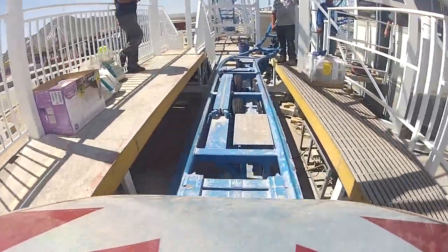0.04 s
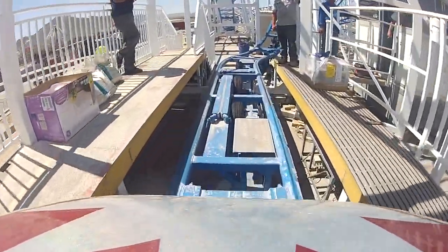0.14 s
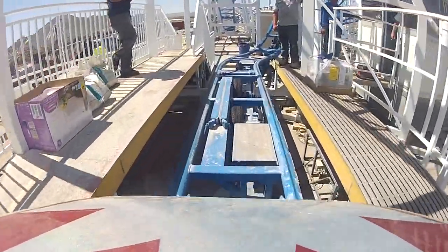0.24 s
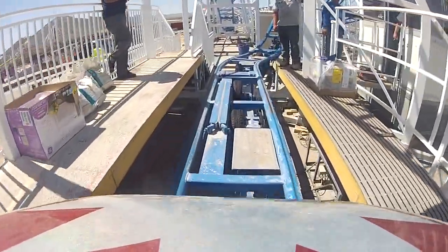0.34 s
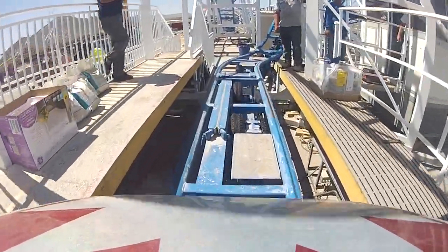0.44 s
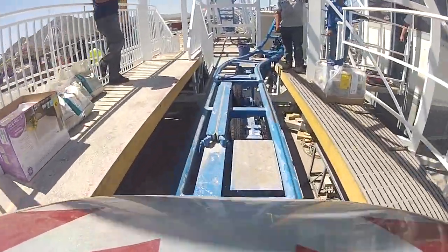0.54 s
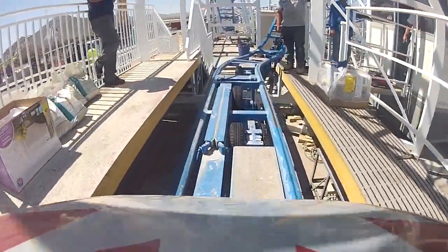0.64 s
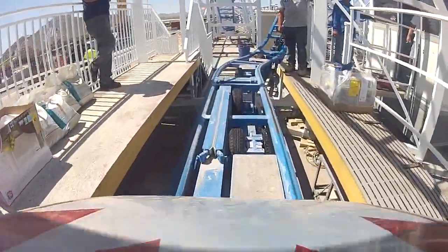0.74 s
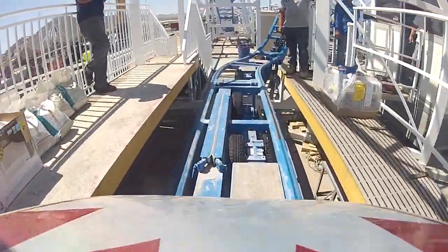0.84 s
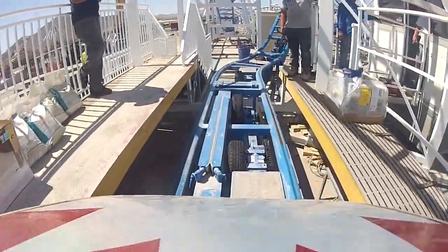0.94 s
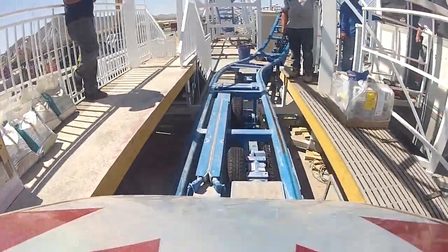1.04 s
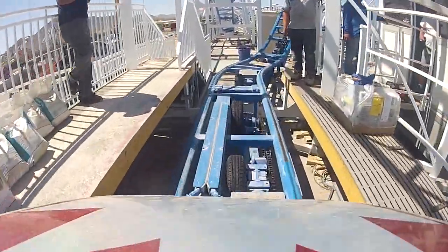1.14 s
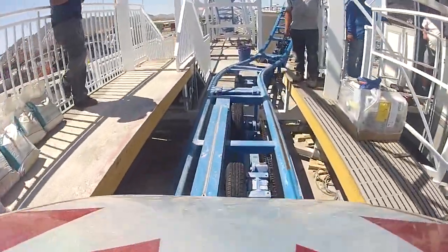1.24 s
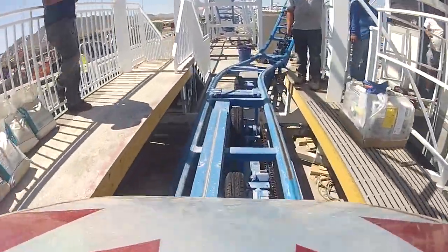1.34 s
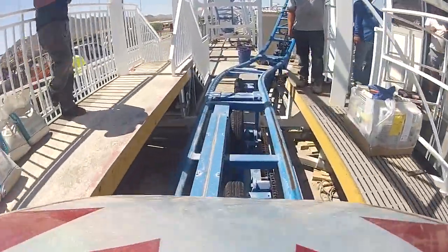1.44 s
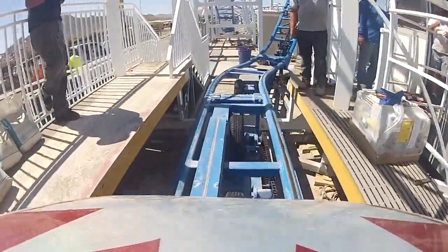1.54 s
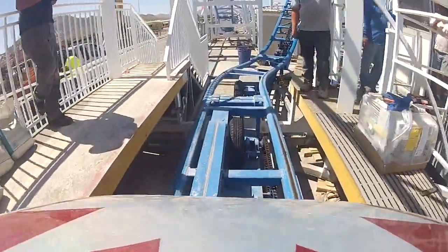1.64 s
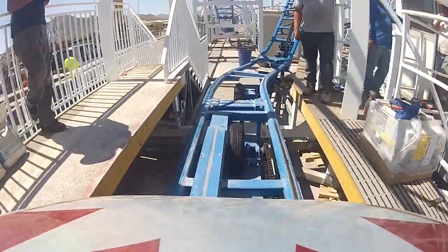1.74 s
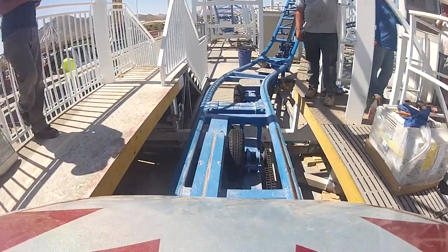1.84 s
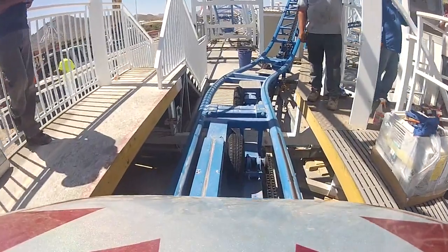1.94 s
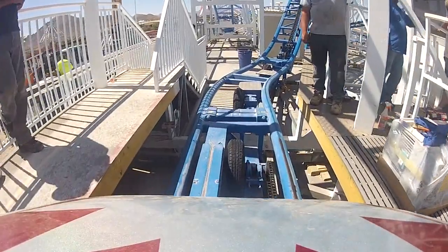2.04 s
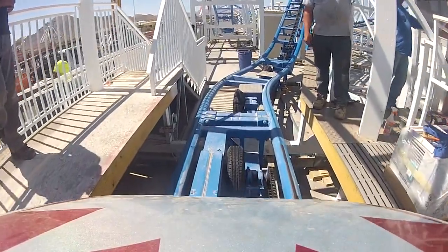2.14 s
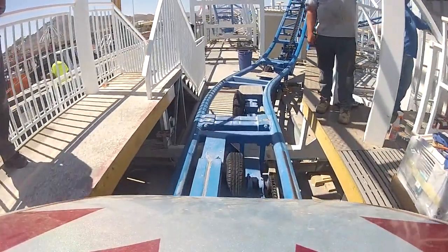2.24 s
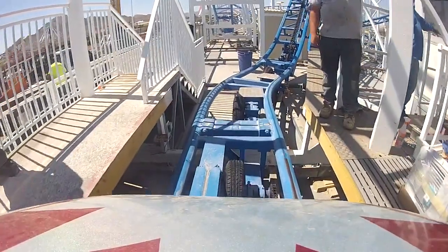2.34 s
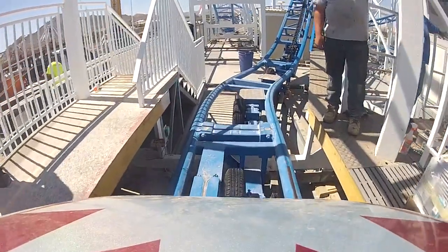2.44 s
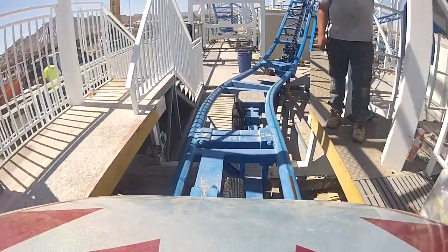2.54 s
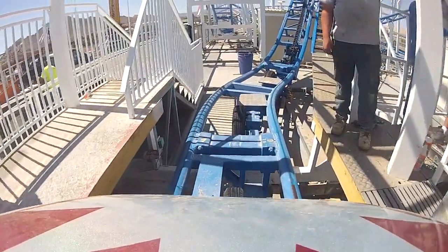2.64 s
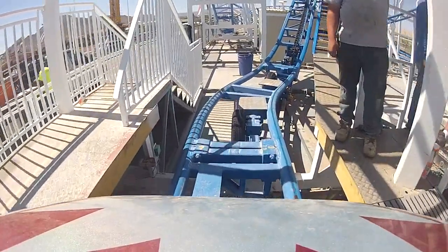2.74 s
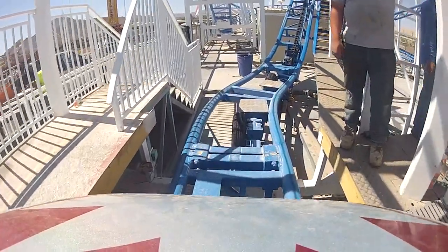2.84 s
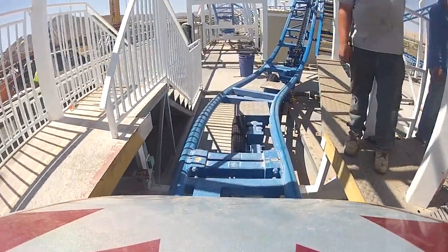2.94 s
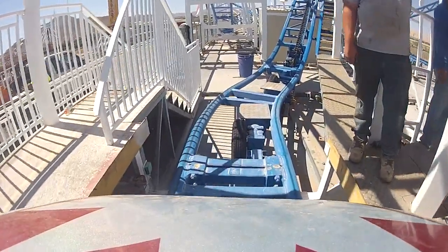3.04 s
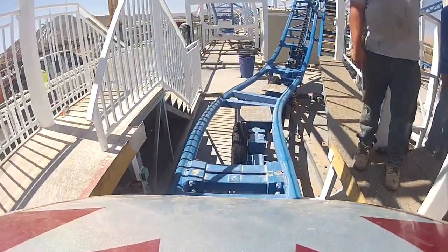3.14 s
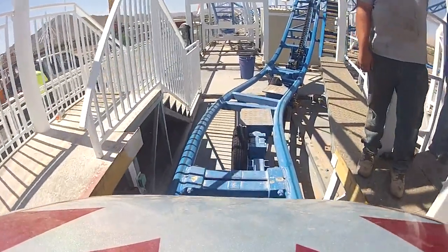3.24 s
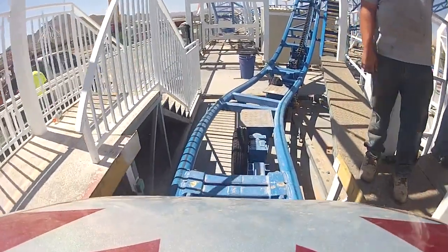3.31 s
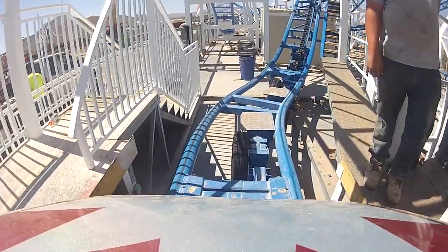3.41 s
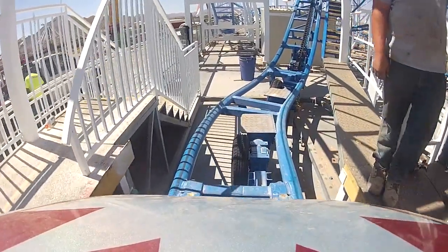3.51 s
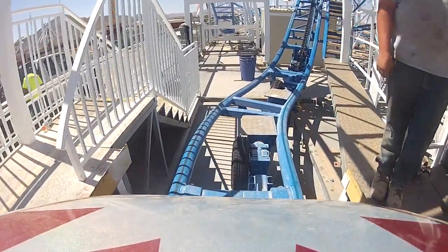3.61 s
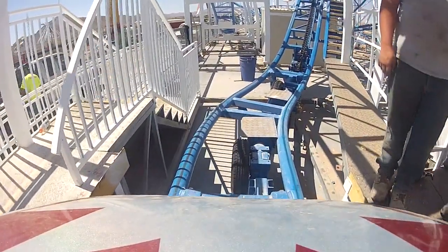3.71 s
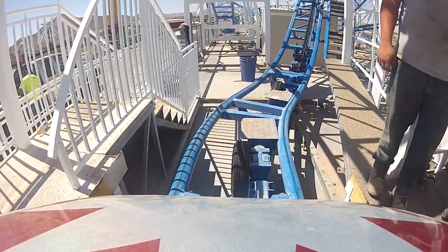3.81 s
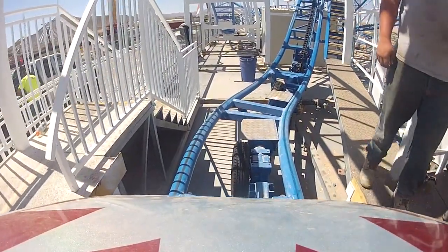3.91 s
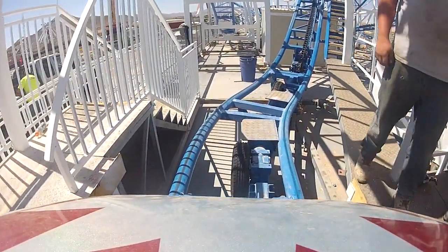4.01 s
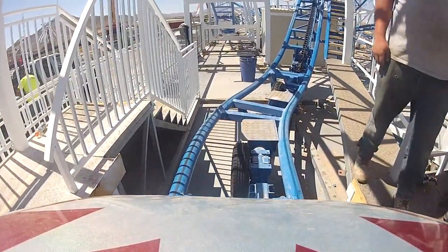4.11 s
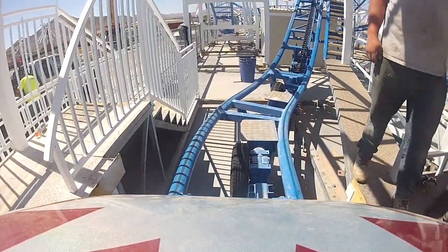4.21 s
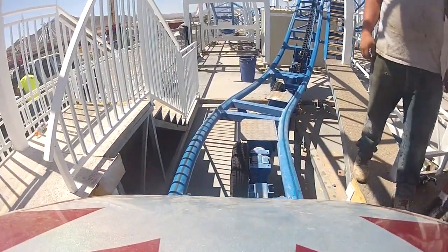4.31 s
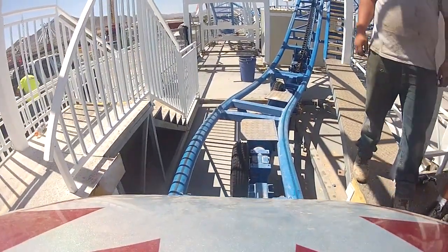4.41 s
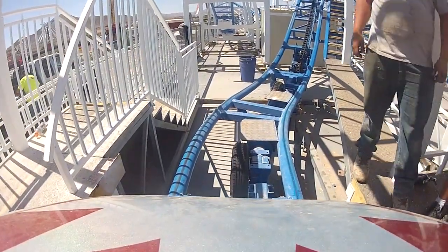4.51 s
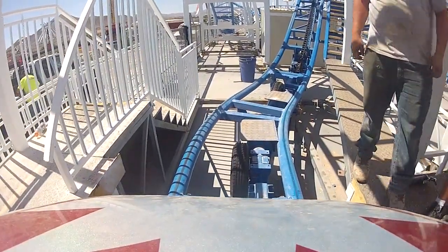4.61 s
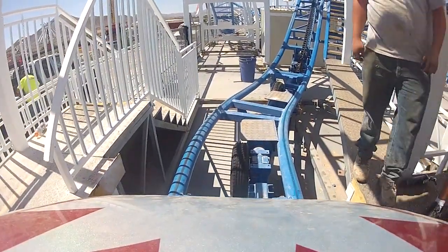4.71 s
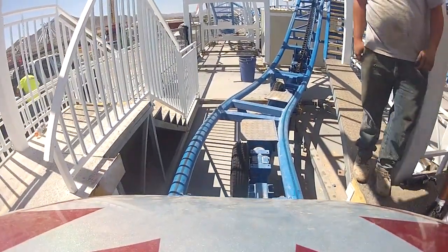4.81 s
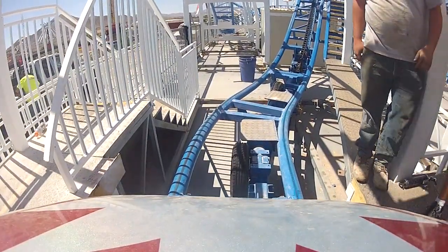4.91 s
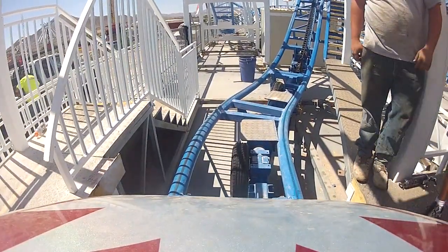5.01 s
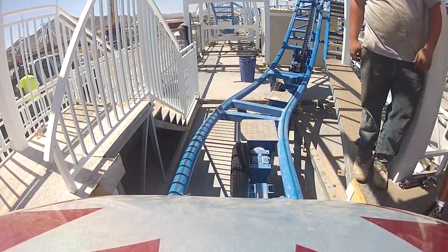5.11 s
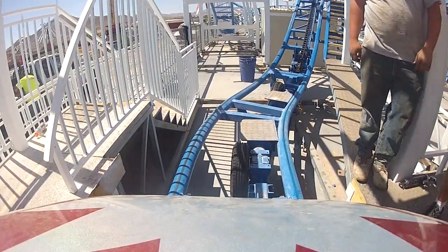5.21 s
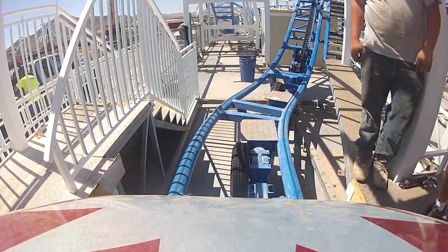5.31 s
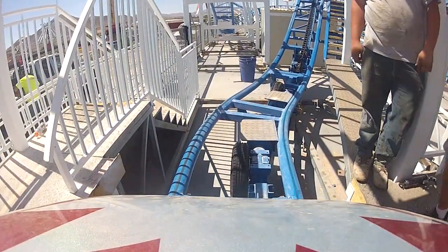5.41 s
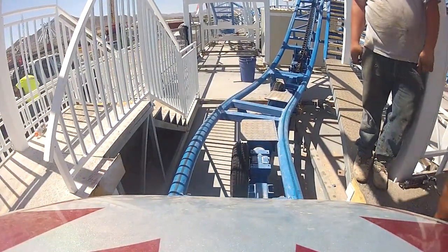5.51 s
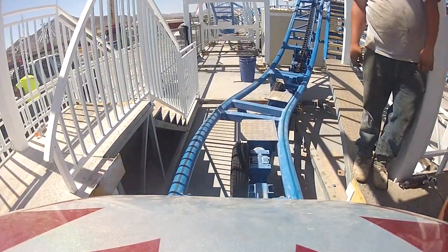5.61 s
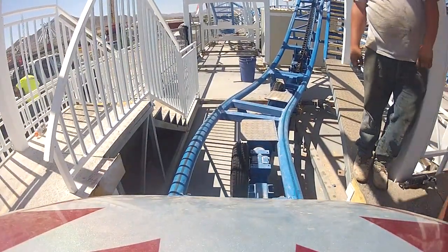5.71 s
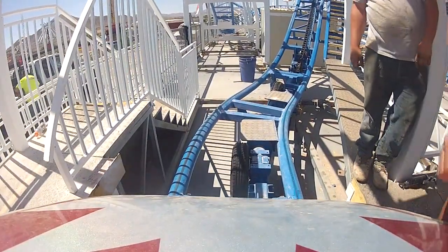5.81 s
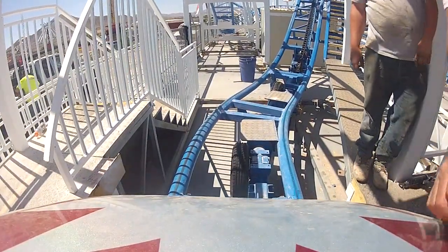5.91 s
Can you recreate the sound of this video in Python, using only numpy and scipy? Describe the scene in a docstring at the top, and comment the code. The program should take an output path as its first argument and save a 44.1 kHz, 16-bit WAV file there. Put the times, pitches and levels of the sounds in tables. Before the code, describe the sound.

A roller coaster train rolls slowly into its station, heard close from the front car. From the start, wheels rumble through the hollow shell with a deep rocking throb. Around 0.7 seconds come a dull thump and low groans from the drive tyres, then more knocks between 1.4 and 1.9 seconds. At 2.5 seconds air brakes hiss softly with another clunk. From 2.8 to 3.3 seconds the cars clunk hard together with steel chatter, brief high tyre squeals, more hiss and a short pad scrape; the hardest hits crackle the microphone, and low groans follow. The rumble eases as the train slows. Near 4 seconds there is a small hiss, a falling squeak and a scrape, then a heavy clunk and a falling groan at 4.2. A few soft knocks come around 5 seconds as the train stops, leaving faint machinery hum and rushing air.

```python
"""A roller coaster train rolls slowly into its station, heard from a microphone on the front car.
Close up, wheels rumble through the hollow shell, the car rocks, and the cars clunk together and stop.
Underneath, drive tyres groan and squeal against the car, air brakes hiss and pads scrape.
Behind it all, the station machinery hums on. There are a few short bright ticks,
and the hardest clunks overload the camera that carries the microphone."""
import sys
import numpy as np
from scipy import signal
from scipy.fft import rfft, irfft
from scipy.io import wavfile
from scipy.ndimage import uniform_filter1d

SR = 44100
rng = np.random.default_rng(int(sys.argv[2]) if len(sys.argv) > 2 else 0)


def to_wav(sig):
    """Store sig (one row per channel, or 1-D mono) as 16-bit WAV at the path in sys.argv[1].

    Samples outside -1..1 are clipped; the rate is SR.
    """
    pcm = np.clip(np.atleast_2d(sig), -1, 1) * 32767
    pcm = np.round(pcm).astype(np.int16)
    wavfile.write(sys.argv[1], SR, pcm.T)  # frames by channels


N = 262836
T = np.arange(N) / SR


def undb(db):
    """Decibels to gain."""
    return 10 ** (np.asarray(db) / 20)


def unit(x):
    """Scale to rms 1."""
    return x / np.sqrt(np.mean(x ** 2))


def walk(rate_hz):
    """Smooth random wandering with spread 1."""
    hz = np.arange(N // 2 + 1) * SR / N
    return unit(irfft(rfft(rng.standard_normal(N)) / (1 + (hz / rate_hz) ** 4), N))


def colour(x, points):
    """Shape x by a spectrum of (f/Hz, level/dB) points, to rms 1."""
    hz, db = np.transpose(points)
    f = np.arange(N // 2 + 1) * SR / N + 1
    gain = undb(np.interp(np.log(f), np.log(hz), db)) / (1 + (hz[0] / f / 2) ** 4)
    return unit(irfft(rfft(x) * gain, N))


def grit(spread_db):
    """Dense micro-impacts of uneven strength."""
    return rng.standard_normal(N) * undb(spread_db * walk(210))


def envelope(s, hold_s, attack_s, release_s, sag_db_per_s=0):
    """Swell up to time s, hold while sagging, die away."""
    age = T - s
    sag = undb(-sag_db_per_s * np.clip(age, 0, hold_s))
    return np.exp(np.minimum(age, 0) / attack_s - np.maximum(age - hold_s, 0) / release_s) * sag


def glide(s, hold_s, hz, octaves_per_s):
    """A pitch that slides evenly from time s for twice the hold."""
    return hz * 2 ** (octaves_per_s * np.clip(T - s, 0, 2 * hold_s))


def phase_of(hz):
    """The running phase of a changing pitch."""
    return 2 * np.pi * np.cumsum(hz) / SR


# Resonances of the track and chassis below the microphone: f/Hz, width/Hz, lift/dB
STEEL_RESONANCES = [(580, 180, 6.5), (715, 130, 4), (878, 46, 5.5), (950, 28, 6.5), (1143, 9.9, 3.5),
                    (1160, 40, 3.5), (1466, 55, 7), (1720, 100, 5.5), (1900, 27, 7), (2043, 67, 7),
                    (2256, 68, 7), (3047, 91, 4.5)]

def steel(x):
    """Track and chassis ring along with any noise that reaches them."""
    ring = sum((undb(db) - 1) * signal.lfilter(*signal.iirpeak(hz, hz / width, fs=SR), x)
               for hz, width, db in STEEL_RESONANCES)
    return unit(x + ring)


# Hum lines of the station machinery: f/Hz, level/dB
HUM_LINES = [(108.5, -45.5), (133.5, -51.5), (172, -56), (353, -86), (640, -75)]
# Air noise around the station: f/Hz, relative level/dB
AIR_SPECTRUM = [(20, 17.5), (50, 25), (75, -6), (120, 20), (220, 16), (330, 10.5), (450, -1.5), (800, -7.5),
                (1100, -2.5), (1500, -4.5), (1850, -10), (2330, 2.5), (2700, -9), (3600, -7), (6000, -23),
                (8000, -17), (14000, -38.5)]

def station(air_db=-49.5):
    """In the background, machinery idles: wavering hum lines over a steady rush of air."""
    hum = sum(undb(db + 2 * walk(5)) * np.sqrt(2) * np.sin(phase_of(hz + 1.5 * walk(8)))
              for hz, db in HUM_LINES)
    swell_db = .5 * walk(10)
    return hum + undb(air_db + swell_db) * steel(colour(rng.standard_normal(N), AIR_SPECTRUM))


# Short bright ticks and overload crackles: t/s, level/dB, f/Hz
BRIGHT_TICKS = [(0.706, -54, 2300), (3.238, -31.5, 1900), (3.625, -57.5, 5570), (4.21, -54.5, 1700)]

def ticks(decay_s=0.0054):
    """Tiny bursts of noise: short bright ticks, and the overload crackle on two hard clunks."""
    out = 0
    for s, db, hz in BRIGHT_TICKS:
        noise = colour(grit(spread_db=-0.5), [(hz / 2, -12), (hz, 0), (2 * hz, -25)])
        out += undb(db) * np.exp(-np.abs(T - s) / decay_s) * noise
    return out


# Dry scrapes of a brake pad: t/s, level/dB, f/Hz, decay/s
PAD_SCRAPES = [(3.057, -33, 2320, 0.037), (4.077, -37, 2100, 0.023)]

def scrapes(rise_s=0.0093):
    """A pad bites with a rasp, then slides off."""
    out = 0
    for s, db, hz, decay_s in PAD_SCRAPES:
        age = np.maximum(T - s, 0)
        spectrum = [(hz / 2, -14), (hz, 0), (1.22 * hz, -6), (2 * hz, -28), (4 * hz, -45)]
        rasp = steel(colour(grit(spread_db=3), spectrum))
        out += undb(db) * (1 - np.exp(-age / rise_s)) * np.exp(-age / decay_s) * rasp
    return out


# Brake hiss as it reaches the front car: f/Hz, relative level/dB
HISS_SPECTRUM = [(300, -20.5), (600, -12.5), (800, -19), (1000, -9.5), (1500, -8.5), (1800, -14.5),
                 (2270, -1), (2700, -15), (3100, -9), (4000, -17), (5300, -21), (6100, -34), (8300, -17),
                 (13000, -43)]
# Bites of the brakes: t/s, hold/s, level/dB, sag/(dB/s), treble/dB
BRAKE_BITES = [(2.455, 0.17, -42, 33.5, 0), (2.817, 0.15, -51, -13, 10), (3.08, 0.16, -43.5, 44, -16),
               (3.375, .04, -51, 4, -25), (3.993, 0.083, -54, 3, 4.5)]

def brakes(split_hz=3000, attack_s=0.022, release_s=0.056):
    """Air escapes and pads rub as the brakes take hold; air is bright, rubbing is dull."""
    hiss = steel(colour(rng.standard_normal(N), HISS_SPECTRUM))
    low = signal.sosfiltfilt(signal.butter(2, split_hz, fs=SR, output="sos"), hiss)
    bites = 0
    for s, hold_s, db, sag_db_per_s, treble_db in BRAKE_BITES:
        grip = undb(db) * envelope(s, hold_s, attack_s, release_s, sag_db_per_s)
        bites += grip * (low + undb(treble_db) * (hiss - low))
    return undb(.5 * walk(20)) * bites


# Tyre slips under the car: t/s, hold/s, level/dB, f/Hz, glide/(octaves/s), roughness/0-1, overtone/dB
TYRE_SQUEALS = [(2.806, 0.029, -33.5, 2028, -1.8, 0.46, -15.5),
                (2.867, 0.065, -33.5, 2055, 0.3, 0.27, -8.5), (4.034, 0.0059, -30.5, 2187, -3, 0.42, -35),
                (4.053, 0.054, -44, 1655, -17, .6, -28)]

def squeal(s, hold_s, db, hz, octaves_per_s, rough, octave_db):
    """Rubber sticks and slips; the rougher the slip, the more pitch and strength scatter."""
    scatter_hz = 360 * rough ** 2 * walk(400)
    phase = phase_of(glide(s, hold_s, hz, octaves_per_s) + scatter_hz)
    flutter_db = 6 * rough * walk(150)
    tone = np.sin(phase) + undb(octave_db) * np.sin(2 * phase)
    return envelope(s, hold_s, attack_s=0.013, release_s=0.018) * undb(db + flutter_db) * tone


# Pushes of the drive tyres: t/s, hold/s, level/dB, sag/(dB/s), f/Hz, glide/(octaves/s)
TYRE_GROANS = [(0.645, 0.11, -15, 8.5, 107, 0.12), (0.881, .03, -13.5, 0, 111, 0.13),
               (1.066, 0.13, -23, -13, 114.7, 0.78), (3.276, 0.059, -15.5, 36, 110.6, -0.92),
               (3.415, 0.021, -18.5, 3, 106, -0.28), (4.001, 0.029, -29.5, -3.5, 108, -0.14),
               (4.233, 0.196, -18.5, 56.5, 171, -0.716)]

def groan(s, hold_s, db, sag_db_per_s, hz, octaves_per_s):
    """Close below the microphone, a drive tyre judders against the underside of the car."""
    phase = phase_of(glide(s, hold_s, hz, octaves_per_s) * (1 + .015 * walk(20)))
    load = envelope(s, hold_s, attack_s=0.021, release_s=0.014, sag_db_per_s=sag_db_per_s)
    return load * undb(db + 1.5 * walk(25)) * np.sqrt(2) * np.sin(phase)


# The run into the station: t/s, speed/entry speed
SLOWDOWN = [(0, 1), (2.6, 1), (3.55, .45), (4.1, .25), (4.6, .06), (5.2, 0)]

def speed():
    """The train slows from its entry speed, 1, to a stop."""
    return np.interp(T, *np.transpose(SLOWDOWN))


# Dips of the car that carries the microphone: t/s, level/dB
CAR_DIPS = [(.72, -16.5), (1.42, -18.5), (1.85, -20), (2.52, -17.5), (2.87, -14), (3.5, -22.5),
            (4.47, -21.5)]

def rocking(sway_hz=22.5, entry_db=-27, rise_s=0.059, settle_s=0.16):
    """The heavy car bounces on its wheels, a throb more felt than heard; each dip swells and settles."""
    dip_power = sum((undb(db) * envelope(s, 0, rise_s, settle_s)) ** 2 for s, db in CAR_DIPS)
    power = (undb(entry_db) * speed()) ** 2 + dip_power
    return np.sqrt(2 * power) * np.sin(phase_of(sway_hz + 0.82 * walk(3.5)))


# Modes of the car shell, right at the microphone: f/Hz, width/Hz, relative level/dB
SHELL_MODES = [(57, 4, -18.5), (107.33, 3.6, 9.5), (122.3, 19.3, 8.5), (152.3, 17, -3.5), (160, 24, -3),
               (184.7, 15.2, -1), (223, 10, -18.5), (249.5, 7.5, -13), (337.6, 27, -17)]

def shell(force, damp_hz=340, node_hz=72.6, node_width_hz=48):
    """The hollow car rings with its modes; its soft panels swallow the treble."""
    t = T[:SR // 2]
    ring = sum(undb(db) * width * np.exp(-np.pi * width * t) * np.sin(2 * np.pi * hz * t)
               for hz, width, db in SHELL_MODES)
    # the shell hardly moves between its lowest two modes
    ring = signal.lfilter(*signal.iirnotch(node_hz, node_hz / node_width_hz, fs=SR), ring)
    ring = signal.sosfilt(signal.butter(4, [32, damp_hz], "band", fs=SR, output="sos"), ring)
    return signal.fftconvolve(force, ring / np.abs(ring).max())[:N]


# Steel clatter as heard on the car: f/Hz, relative level/dB
CLATTER_SPECTRUM = [(150, 8.5), (290, 18.5), (385, -4), (470, -4.5), (570, -6), (710, -9.5), (880, -8.5),
                    (1300, -10), (1700, -27.5), (2100, -12.5), (2700, -39.5), (4000, -43.5), (7000, -44),
                    (14000, -58.5)]

def clatter(spread_db):
    """Micro-impacts of steel ring through the track and chassis."""
    return steel(colour(grit(spread_db), CLATTER_SPECTRUM))


# The three quick contacts of a clunk: offset from the main blow/bounces, relative level/dB
CLUNK_CONTACTS = [(-0.94, -6), (0, -1), (0.95, -7.5)]
# Wheel and coupling blows: t/s, thump level/dB, bounce gap/ms, relative clatter level/dB, decay/ms
CLUNK_BLOWS = [(0.666, -10.5, 9.6, -54.5, 15), (0.71, -17, 4.7, -43.5, 11), (1.408, -13, 6.4, -48, 28),
               (1.448, -19.5, 6.1, -52.5, 6.5), (1.534, -18, 5.3, -47.5, 15),
               (1.773, -12.5, 5.4, -43.5, 24), (1.902, -16.5, 9.3, -53, 18), (2.495, -8, 5.6, -34, 14),
               (2.812, -3, 7.2, -36, 25), (2.846, 1, 11.7, -61, 10), (2.886, -8.5, 7.2, -37.5, 22),
               (3.014, 2.5, 6.5, -29, 27.4), (3.057, -4, 7.3, -67, 10), (3.178, -10, 5.1, -64, 8.6),
               (3.231, 6, 5.03, -21, 8), (4.208, 0, 6.3, -34, 17), (4.84, -20, 4.85, -72, 8),
               (4.922, -30.5, 6.7, -77, 7.3), (5.069, -33, 5.2, -70, 8)]

def clunks(contact_share=0.31, tail_db=-23, tail_s=0.13):
    """Each blow touches, strikes and rebounds on the shell while loose steel parts chatter around it."""
    force, chatter = np.zeros(N), np.zeros(N)
    for s, thump_db, bounce_ms, clatter_db, decay_ms in CLUNK_BLOWS:
        age_ms = (T - s) * 1000
        for offset, db in CLUNK_CONTACTS:
            push = np.cos(np.pi * np.clip((age_ms / bounce_ms - offset) / contact_share, -.5, .5)) ** 2
            force += undb(thump_db + db) * push / push.sum()
        burst = np.exp(-np.abs(age_ms) / decay_ms)
        tail = undb(tail_db) * (age_ms > 0) * np.exp(-np.abs(T - s) / tail_s)
        chatter += undb(clatter_db) * (burst + tail)
    return shell(force) + 2.6 * chatter * clatter(spread_db=-2)


def rolling(entry_db=-24.5, tread_hz=170, clatter_db=-44, shudder_db=-13):
    """Close up, wheels ride uneven rails, soft treads rounding each bump; speed and clunks shake the car."""
    shudder_power = sum((undb(shudder_db + thump_db) * envelope(s, 0, attack_s=.012, release_s=.091)) ** 2
                        for s, thump_db, *_ in CLUNK_BLOWS)
    shaking = np.sqrt((undb(entry_db) * speed()) ** 2 + shudder_power)
    bumps = grit(spread_db=4)
    rumble = shell(signal.sosfilt(signal.butter(2, tread_hz, fs=SR, output="sos"), bumps))
    # even out the random swells so the rumble stays steady
    rumble /= np.sqrt(uniform_filter1d(rumble ** 2, size=6000))
    return shaking * (rumble + undb(clatter_db) * clatter(spread_db=3))


def scene():
    """All sources reach one microphone on the front car; both channels carry it."""
    sound = rolling() + rocking() + clunks() + brakes() + scrapes() + ticks() + station()
    sound += sum(groan(*row) for row in TYRE_GROANS)
    sound += sum(squeal(*row) for row in TYRE_SQUEALS)
    return np.array([sound, sound])


def gain_control(x, limit_db=2.5, attack_s=.025, recover_db_per_s=55):
    """The gain drops just after a peak over the limit and creeps back."""
    over_db = np.maximum(20 * np.log10(np.abs(x).max(axis=0) + 1e-9) - limit_db, 0)
    held_db = np.maximum.accumulate(over_db + recover_db_per_s * T) - recover_db_per_s * T
    step = 1 / (attack_s * SR)
    return x * undb(-signal.lfilter([step], [1, step - 1], held_db))


def record(dry, wobble_hz=12000, wobble_samples=1.33, lag_samples=0.7, top_hz=14900):
    """The camera clips and ducks on the hardest clunks; its wobbling sample timing adds a thin sizzle."""
    x = np.clip(gain_control(dry), -1, 1)
    wobble = np.cos(2 * np.pi * wobble_hz * T + np.array([[0], [np.pi / 2]]))
    shift = wobble_samples * wobble + lag_samples * np.array([[-.5], [.5]])
    x = x + shift * np.gradient(x, axis=1)  # a small time shift adds the slope of the wave
    return signal.sosfilt(signal.ellip(8, .2, 70, top_hz, fs=SR, output="sos"), x)


dry = scene()
out = record(dry)
to_wav(out)
```